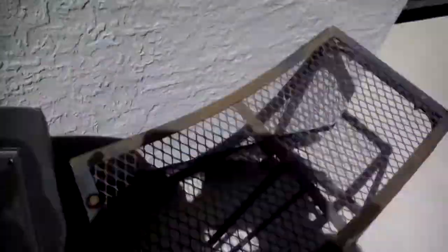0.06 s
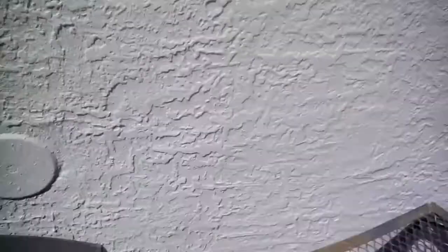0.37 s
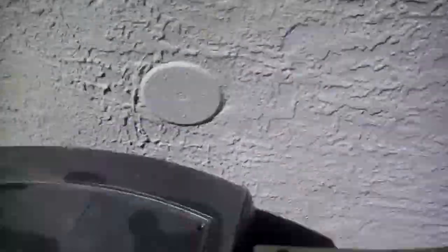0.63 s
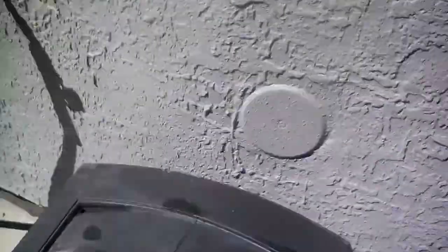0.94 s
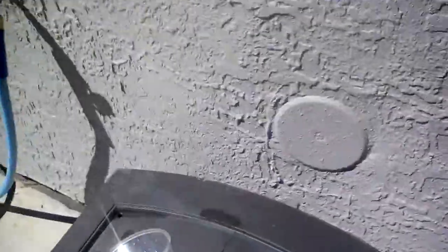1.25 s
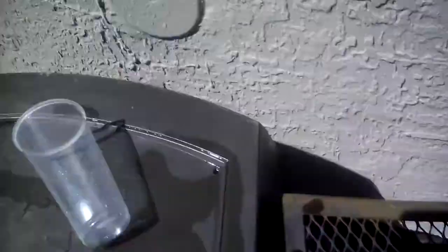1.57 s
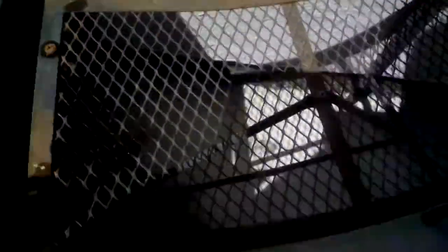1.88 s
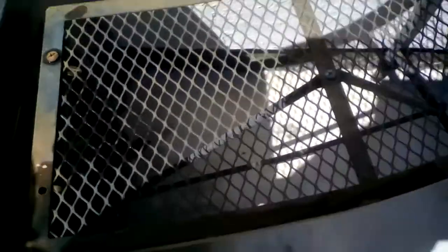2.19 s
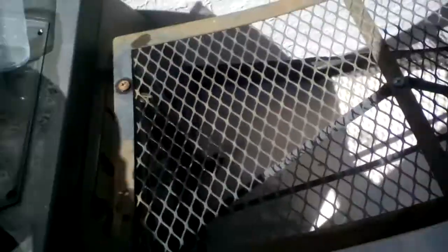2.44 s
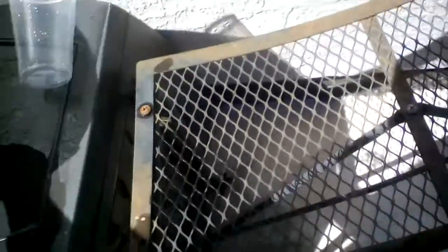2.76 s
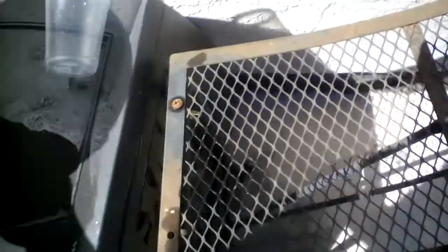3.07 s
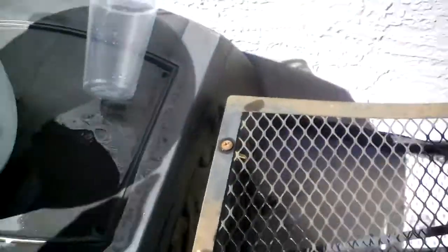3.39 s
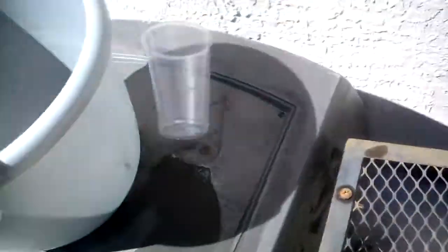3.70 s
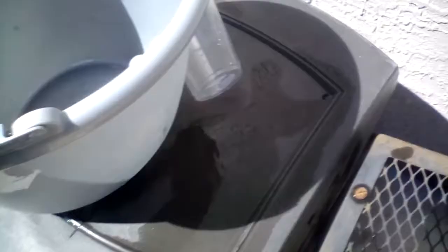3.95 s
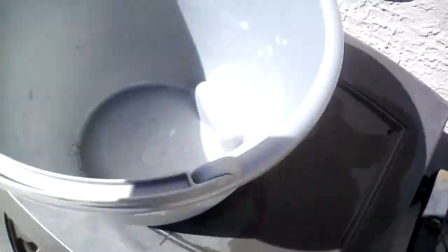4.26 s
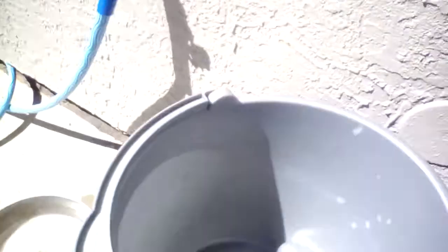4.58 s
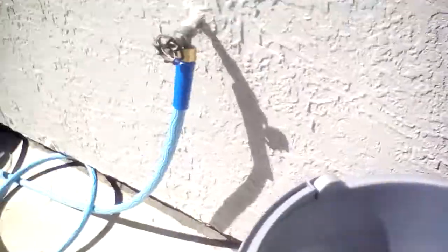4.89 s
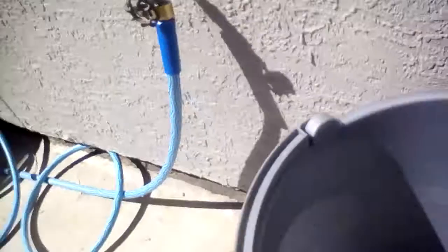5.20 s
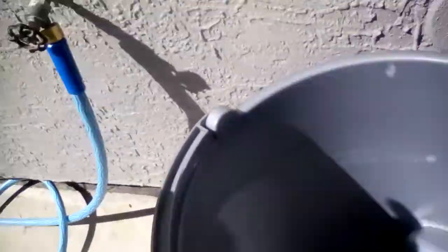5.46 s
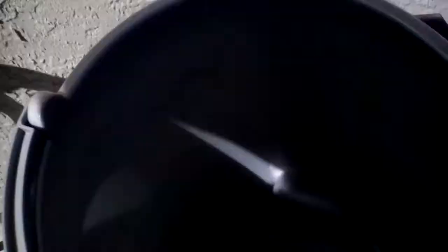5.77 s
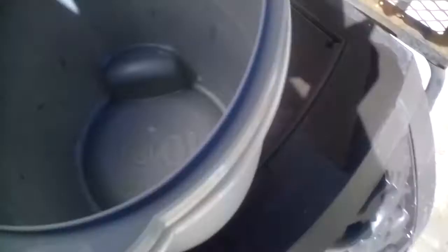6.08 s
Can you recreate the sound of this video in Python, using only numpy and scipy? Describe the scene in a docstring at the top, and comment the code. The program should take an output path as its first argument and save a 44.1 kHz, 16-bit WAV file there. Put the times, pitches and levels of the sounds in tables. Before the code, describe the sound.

A hand grips a camera, making small sharp clicks, rustles and soft hisses of skin sliding right at the microphone. About three seconds in, a little further off, a plastic bucket bumps onto a hollow plastic stand with a low ring, scrapes along it, clacks brightly and is lifted off with a thud. The close clicking, rubbing and dull thumping then return until the end, over the faint hush of a quiet patio.

```python
"""First come small clicks and a soft hiss: a camera's case snaps under someone's grip, and skin
slides past its microphone. With the other hand they move a plastic bucket on a quiet patio.
About three seconds in, the bucket bumps onto a hollow plastic stand, scrapes along it, clacks
and is lifted off. Each hit makes the plastic ring; each scrape is a stream of tiny slips.
The hand keeps clicking, rustling and thudding on the case to the end."""
import sys
import numpy as np
from scipy import signal
from scipy.fft import rfft, irfft
from scipy.io import wavfile
from scipy.ndimage import uniform_filter1d

SR = 44100
rng = np.random.default_rng(int(sys.argv[2]) if len(sys.argv) > 2 else 0)


def put_to_file(sound):
    """Save the sound as 16-bit audio at rate SR, in the file named by the first command-line argument."""
    columns = np.atleast_2d(sound).T  # one column per channel
    safe = np.clip(columns, -1, 1)
    whole_steps = np.round(safe * 32767)
    wavfile.write(sys.argv[1], SR, whole_steps.astype(np.int16))


N = 270774
RING_TIME = np.arange(16384) / SR  # seconds since a hit; ring_s is the time a ring takes to fall 60 dB


# The notes the camera case rings at: pitch_hz, boost_db, ring_s
CASE_NOTES = [(320, -12, 0.05), (715, 1.5, 0.019), (1042, 0.5, 0.018), (1479, 3, 0.022), (2190, 1, 0.022),
              (2860, -4.5, 0.036), (5600, -14.5, 0.007)]
def click(db, thud_db, bright_db, muffle_db, rebound_s=.0004, rebound_db=-9):
    """The case snaps and springs back; the finger adds a thud and muffles the highest part."""
    snap = ring(CASE_NOTES, detune=0.11, scatter_db=3.5)
    snap = snap + noisy_ring(ring_s=0.012, db=-5.5) + noisy_ring(ring_s=.12, db=-32.5)
    snap = echo(snap[:4096], rebound_s * rng.uniform(.6, 1.4), -undb(rebound_db))
    treble_db = db + bright_db
    top_db = treble_db - muffle_db
    lows = [(40, thud_db - 14), (130, thud_db + 0.5), (350, thud_db + 1)]
    mids = [(900, db - 3.5), (2000, db - 5.5), (3200, treble_db), (5800, treble_db - 1)]
    highs = [(8200, top_db - 2), (10500, top_db), (15500, top_db - 9)]
    return colour(snap, lows + mids + highs)


# The clear clicks of the case: start_s, strength_db, bright_db, muffle_db
CASE_CLICKS = [(0.0405,-8,-5.5,21), (.123,-8,-38,12), (0.1304,-2.5,4,31.5), (0.2215,8,-3.5,39),
               (0.4229,7,-17.5,37), (.471,-10,-3,28), (0.4863,5,-23.5,14), (.585,1.5,-13.5,58),
               (0.7466,2,-21,32), (1.2079,11.5,-14.5,32), (1.3975,0.5,-39,10), (1.5505,-9,6,10),
               (1.553,-13,12.5,14), (1.5623,-9,6,7), (1.5744,8,-6.5,20), (1.6029,2.5,-18.5,38),
               (1.675,11.5,-6,23), (1.723,7.5,-6,24), (1.755,4,-11,18.5), (1.78,-1,-3.5,6.5),
               (1.7965,4.5,-12,16.5), (1.8,-7,-6,5), (1.811,3,-10,11), (1.8184,11,-6,19),
               (1.8582,-17,20,14), (1.9799,12,-18,30), (2.083,-25,7,19), (2.1087,-9.5,-11.5,20.5),
               (2.1517,11,-12.5,15), (2.2156,13.5,-3,29.5), (2.242,-10.5,10,18.5), (2.2826,-6.5,-5,19),
               (2.3105,-10,-6.5,12), (2.7755,-21,-11.5,-1), (3.8893,3.5,-5.5,24), (4.0106,0.5,-12.5,37.5),
               (4.073,-12,-4.5,38), (4.1373,16,-4,55), (4.146,-0.5,-28,14), (4.1736,-11,-17,10),
               (4.342,-6,-16,11.5), (4.388,9,1,21), (4.4719,-5.5,-15,28.5), (4.551,14,-9,5),
               (4.5573,8.5,-7,18), (4.5814,3,0.5,14), (4.607,6,-4,23), (4.6946,11.5,-14,43),
               (5.0191,13.5,-23.5,20), (5.345,11.5,-14,20), (5.35,4,-25,40), (5.371,10.5,-25,22),
               (5.3888,9,-14,22), (5.4625,-0.5,-12.5,41), (5.5299,16.5,-15,10.5), (5.6807,-16,-37,6.5),
               (5.8393,-2,-3,0.5), (5.885,10.5,-16.5,39), (5.8918,8,-4.5,30), (5.922,-1.5,-18.5,8),
               (5.9577,-2.5,-18,14), (6.0186,12,-12,25)]
def case_clicks(thud_over_rumble_db=54.5, thud_share=0.3):
    """The case clicks in the hand; a firmer grip or a stronger click makes the fingertip thud more."""
    out = np.zeros(N)
    times, _, rumble_db = np.transpose(GRIP_EFFORT)
    for start_s, db, bright_db, muffle_db in CASE_CLICKS:
        thud_db = np.interp(start_s, times, rumble_db) + thud_over_rumble_db + thud_share * db
        add(out, start_s, click(db, thud_db, bright_db, muffle_db))
    return out


# The notes the bucket rings at: pitch_hz, boost_db, ring_s
BUCKET_NOTES = [(147, 12, 0.12), (200, 16, 0.064), (330.6, 16, 0.15), (859, 8.5, 0.031), (932, 7.5, 0.023),
                (1243, -13, 0.076), (1240, 0, 0.046), (1737, -5, 0.056), (2397, 12.5, 0.056),
                (3520, 14.5, 0.055), (4150, 15, 0.035)]
# Hard hits on the bucket's wall: start_s, strength_db, dull_above_hz
BUCKET_HITS = [(3.4893,5,6800), (3.4912,14.5,3020), (3.536,2.5,2260), (3.803,2,4770), (4.5605,9,1430)]
def bucket_clacks():
    """Hard hits make the bucket's wall ring with a short, bright clack."""
    return knocks(BUCKET_HITS, BUCKET_NOTES, crack_db=3.5, crack_s=0.041,
                  tail_db=-13, tail_s=0.25, spike_db=-14.5, top_db=-11.5)


# The notes the hollow stand rings at: pitch_hz, boost_db, ring_s
STAND_NOTES = [(136.5, 20, 0.14), (220.6, 19, 0.15), (340, 19.5, 0.1), (553, 6, 0.083), (910, 5, 0.26),
               (1130, 6, 0.046), (1534, 10, 0.098), (1590, 11, 0.24), (2360, -3, .1), (3760, 2, .14)]
# The bucket bumping the stand: start_s, strength_db, dull_above_hz
STAND_HITS = [(2.8862, 12, 1820), (2.896, 2, 2450), (2.903, 8.5, 1400), (2.920, -5, 1690),
              (2.930, 7.5, 1690), (2.953, -18, 1870), (3.021, -10, 1720), (3.199, -2.5, 1500),
              (3.278, 0, 422), (3.321, -6.5, 500)]
def stand_knocks():
    """The bucket lands, and the stand answers with a low, hollow ring."""
    return knocks(STAND_HITS, STAND_NOTES, crack_db=-0.5, crack_s=0.028,
                  tail_db=-3, tail_s=0.37, spike_db=-25, top_db=-33)


# How the scrape swells and fades: time_s, grit_db, rumble_db
SCRAPE_LEVELS = [(2.885,-31,-29.5), (2.93,-42,-38.5), (3.02,-40,-55), (3.19,-41,-38.5), (3.25,-53.5,-50),
                 (3.33,-50.5,-45.5), (3.43,-74,-58.5), (3.54,-64,-45), (3.78,-55.5,-52.5), (3.98,-64,-52)]
# The tone of its grit: pitch_hz, level_db
GRIT_TONE = [(200, -13), (550, 8.5), (1150, 5), (1800, -12.5), (3500, -15.5), (5800, -29), (7200, -38),
             (10000, -63)]
def bucket_scrape():
    """The bucket drags along the stand, and its tiny slips set the stand ringing."""
    return rub(gains(SCRAPE_LEVELS), STAND_NOTES, GRIT_TONE, slips_per_s=1200,
               spread_db=0, grit_db=-1.5, rumble_db=2.5, uneven_db=4.5)


def bucket_chatter(hz=1650, ring_s=0.011, rise_s=0.0011, db=-26, spread_db=3, count=7, gap_s=.0091):
    """Plastic sticks and slips a few times as the bucket lifts."""
    out = np.zeros(N)
    times = 3.823 + gap_s * np.arange(count)
    shape = fade(ring_s) * (1 - np.exp(-RING_TIME / rise_s))
    for start_s, (size, pitch, late) in zip(times, rng.uniform(-1.9, 1, (count, 3))):
        slip = shape * np.sin(2 * np.pi * hz * (1 + .08 * pitch) * RING_TIME)
        add(out, start_s + 0.0007 * late, undb(db + spread_db * size) * slip)
    return out


# Dull bumps that reach the microphone through the hand: start_s, strength_db, pitch_hz, ring_s
HAND_BUMPS = [(.594,-28.5,100,0.027), (0.694,-24.5,111,0.078), (1.31,-32.5,93,0.11),
              (1.711,-14.5,200,0.021), (2.276,-27,172.5,0.11), (3.8045,5.5,139,0.021), (3.813,-6,158,0.023),
              (4.008,-23,111,0.065), (4.147,-26,238,0.013), (4.159,-21,260,0.016), (4.1734,-18,288,0.013),
              (4.353,-17,230,0.012), (4.367,-13,278,0.012), (4.5595,-7,99,0.034), (5.019,-14,181,0.026),
              (5.258,-26.5,220,0.033), (5.351,-20,220,0.013), (5.369,-18.5,115,0.02), (5.434,-23,233,0.019),
              (5.6807,-10.5,283,0.015), (5.758,-14.5,204,0.01), (5.924,-25.5,185,0.037),
              (5.958,-8,220,0.015)]
def hand_bumps(settle_s=0.0023, rise_s=0.0015, overtone_ratio=2.17, overtone_db=-12):
    """Short thuds with one higher note on top; the pitch sags as the contact relaxes."""
    out = np.zeros(N)
    for start_s, db, hz, ring_s in HAND_BUMPS:
        sagging_hz = hz * (1 + np.exp(-RING_TIME / settle_s))
        low_note = np.sin(2 * np.pi * np.cumsum(sagging_hz) / SR)
        overtone = undb(overtone_db) * np.sin(2 * np.pi * overtone_ratio * hz * RING_TIME)
        shape = fade(ring_s) * (1 - np.exp(-RING_TIME / rise_s))
        add(out, start_s, -undb(db) * shape * (low_note + overtone))
    return colour(out, [(25, -2), (50, 2), (90, 6), (500, -4), (1500, 10.5)])


# Strokes of skin past the microphone: start_s, length_s, hiss_db, air_below_hiss_db, hole_over_hiss_db
SKIN_STROKES = [(0,0.054,-60,16,-16), (0.361,0.046,-47.5,25,-13), (0.447,0.5,-60,36,-16),
                (0.68,0.13,-49.5,4.5,1.5), (0.842,.19,-51.5,1.5,6.5), (1.028,0.078,-51.5,-1,1),
                (1.128,0.074,-48.5,3,3.5), (1.217,0.052,-50.5,7,-20), (1.294,0.046,-78,-7,-12),
                (1.365,0.017,-39,1.5,-1), (1.411,0.036,-43.5,0.5,-1), (1.504,0.075,-42,3.5,-14),
                (1.648,0.38,-53.5,6,-9), (2.022,0.36,-66,10.5,-4), (2.356,0.17,-83,14,6),
                (4.015,0.055,-54.5,13,-20), (4.11,0.084,-58,7.5,-12.5), (4.317,0.097,-62.5,4.5,-16),
                (4.39,0.27,-60,26.5,-16.5), (4.704,0.19,-40,10.5,-21), (4.941,0.13,-53,23,-7),
                (5.084,0.069,-54.5,24,-13), (5.187,0.09,-54.5,11.5,-11), (5.303,0.3,-68.5,9,-6),
                (5.83,0.21,-69.5,4,-9)]
def stroke_gains(rise_s=0.014, fall_s=0.022, arch_db=0.5):
    """Volume curves for hiss, air and hole; a stroke peaks midway, where the skin moves fastest."""
    t = np.arange(N) / SR
    out = np.zeros((3, N))
    for start_s, length_s, db, muffle_db, hole_db in SKIN_STROKES:
        rise = (1 + np.tanh((t - start_s) / rise_s)) / 2
        fall = (1 + np.tanh((start_s + length_s - t) / fall_s)) / 2
        arch = np.sin(np.pi * np.clip((t - start_s) / length_s, 0, 1)) - 2 / np.pi
        crest = np.interp(arch, [-1, 0, 1], undb([-arch_db, 0, arch_db]))
        out += np.outer(undb([db, db - muffle_db, db + hole_db]), rise * fall * crest)
    return out


# The tones of the skin's hiss, its airy top and the microphone's small hole: pitch_hz, level_db
HISS_TONE = [(400,-15.5), (1200,-9.5), (2200,-5.5), (3400,-4.5), (4500,-2), (5700,-6), (6800,-7.5),
             (8000,-25), (12000,-28.5)]
AIR_TONE = [(4500, -1), (7000, -4), (8500, -2.5), (10200, -2.5), (13000, -4), (15500, -12.5)]
HOLE_TONE = [(3000,-27), (4600,-5.5), (5500,-5), (6200,-3), (7200,-16.5), (9000,-30.5)]
def sliding_skin(hiss_db=1, uneven_db=0.9):
    """Sliding skin hisses; over the microphone's hole it turns airier and makes the hole ring."""
    hiss_gain, air_gain, hole_gain = stroke_gains()
    rubbing = friction(CASE_NOTES, slips_per_s=25000, spread_db=2.5, ring_s=.03, ring_db=-11)
    hiss = undb(hiss_db) * hiss_gain * unit(colour(rubbing, HISS_TONE))
    air = air_gain * noise(AIR_TONE)
    hole = hole_gain * noise(HOLE_TONE)
    return (hiss + air + hole) * undb(uneven_db * wander(turns_per_s=37))


# Short skids of a finger: start_s, length_s, level_db, dull_above_hz
FINGER_SKIDS = [(0.352,0.062,-34.5,1880), (0.672,0.052,-38,1370), (1.97,0.044,-30.5,2340),
                (2.262,0.076,-44,1140), (2.493,0.064,-60,1800), (4,0.061,-44.5,800), (5.2,0.087,-47.5,600),
                (5.42,0.017,-34,1496)]
def finger_rasps():
    """A finger skids, and its crowded slips ring the case."""
    out = np.zeros(N)
    skid = friction(CASE_NOTES, slips_per_s=2400, spread_db=0.5, ring_s=0.022, ring_db=-2.5)
    for start_s, length_s, db, hz in FINGER_SKIDS:
        first, count = int(start_s * SR), int(length_s * SR)
        lows = [(80, -6), (hz / 4, -6), (hz / 2, -1), (hz * 0.75, 0)]
        highs = [(hz * 1.18, -9), (hz * 1.9, -14), (hz * 2.7, -26), (12000, -46)]
        burst = colour(skid[first:first + count], lows + highs)
        add(out, start_s, undb(db) * unit(burst * signal.windows.tukey(count, .6)))
    return out


# How hard the hand works on the case: time_s, rustle_db, rumble_db
GRIP_EFFORT = [(0,-66,-75), (.32,-61,-53), (.42,-47.5,-51), (.55,-50.5,-46), (0.638,-62,-63.5),
               (.76,-49,-47), (.85,-80,-80), (1.28,-64.5,-50), (1.47,-53,-53), (1.75,-42.5,-46.5),
               (1.97,-41,-47.5), (2.18,-60,-46.5), (2.5,-68.5,-54), (2.8,-78,-63), (3.95,-69,-62.5),
               (4.12,-45,-43.5), (4.25,-61.5,-51), (4.599,-55.5,-50), (4.82,-50.5,-42), (4.93,-53.5,-58),
               (5.06,-53,-44.5), (5.17,-66,-61.5), (5.4,-45.5,-46.5), (5.6,-51,-48.5), (5.7,-71,-56),
               (5.92,-44.5,-42.5), (6.14,-77,-70)]
def grip_gains(shift_rustle_db=-50, shift_rumble_db=-48.5, click_share=0.68, lead_s=.003, settle_s=.013):
    """Volume curves for rustle and rumble: the hand's slow work plus a brief shift at each click."""
    rustle, rumble = gains(GRIP_EFFORT)
    shift = np.zeros(N)
    for start_s, db, _, _ in CASE_CLICKS:
        shift[int(start_s * SR)] = undb(click_share * db)
    lag = RING_TIME - RING_TIME.mean()
    swell = np.exp(-np.maximum(-lag / lead_s, lag / settle_s))
    shift = signal.fftconvolve(shift, swell, mode="same")
    rustle = np.hypot(rustle, undb(shift_rustle_db) * shift)
    rumble = np.hypot(rumble, undb(shift_rumble_db) * shift)
    return rustle, rumble


# The tone of the grip's rustle: pitch_hz, level_db
RUSTLE_TONE = [(150, -25), (450, 2), (1000, -3.5), (1700, -5.5), (2600, -15), (5000, -17.5), (8000, -44.5)]
def grip_rustle(rustle, rumble):
    """The hand rubs the case as it holds on, rustling and rumbling."""
    return rub((rustle, rumble), CASE_NOTES, RUSTLE_TONE, slips_per_s=1800,
               spread_db=3.5, grit_db=-1, rumble_db=-0.5, uneven_db=3)


def finger_creaks(rustle, count=330, low_hz=260, high_hz=1700, cycles=7, softest_db=15, range_db=10):
    """Fingertips let go in small jerks, each a dull pop with its own pitch, louder as the grip shifts."""
    out = np.zeros(N)
    t = RING_TIME[:2048]
    for when, pitch, size in rng.random((count, 3)):
        hz = low_hz * (high_hz / low_hz) ** pitch
        pop = fade(cycles / hz)[:len(t)] * np.sin(2 * np.pi * hz * t)
        add(out, when * N / SR, rustle[int(when * N)] * undb(softest_db + range_db * size) * pop)
    return out


def small_ticks(count=45, over_rustle_db=31, spread_db=4):
    """The case ticks faintly at random moments, louder when the grip is busy."""
    out = np.zeros(N)
    times, rustle_db, _ = np.transpose(GRIP_EFFORT)
    for when, size in rng.random((count, 2)):
        start_s = when * N / SR
        db = np.interp(start_s, times, rustle_db) + over_rustle_db + spread_db * (2 * size - 1)
        add(out, start_s, click(db, thud_db=db + 7, bright_db=-8.5, muffle_db=24))
    return out


# The tone of the outdoor background: pitch_hz, level_db
PATIO_TONE = [(30, -12.5), (55, -5), (90, 4.5), (150, -26), (400, -37), (950, -15), (1800, -38.5),
              (6500, -35), (8000, -46.5), (15000, -59.5)]
def patio(level_db=-58.5):
    """A faint, steady outdoor hush."""
    return undb(level_db) * noise(PATIO_TONE)


def knocks(hits, notes, crack_db, crack_s, tail_db, tail_s, spike_db, top_db):
    """Hits make a whole hollow plastic wall ring; a softer contact leaves out the highs."""
    out = np.zeros(N)
    for start_s, db, hz in hits:
        body = ring(notes, detune=.01, scatter_db=2, spike_db=spike_db)
        hit = body + noisy_ring(crack_s, crack_db) + noisy_ring(tail_s, tail_db)
        contact_tone = [(40, -14), (120, -2), (hz, -2), (2 * hz, -14), (4 * hz, -28), (8 * hz, -50)]
        add(out, start_s, undb(db) * colour(hit, contact_tone))
    tone = [(1700, 1), (2150, -6.5), (3300, -8.5), (6300, -7), (8000, top_db), (15000, top_db - 7.5)]
    return colour(out, tone)


# The tone of the low rumble under any rubbing: pitch_hz, level_db
RUMBLE_TONE = [(25, -26), (55, -7.5), (100, 3.5), (230, -4), (380, -12.5), (700, -27), (2000, -66.5)]
def rub(volumes, notes, tone, slips_per_s, spread_db, grit_db, rumble_db, uneven_db):
    """Gritty slips ring an object over the low rumble of the moving contact."""
    grit_gain, rumble_gain = volumes
    grains = friction(notes, slips_per_s, spread_db, ring_s=.03, ring_db=2.5)
    grit = undb(grit_db) * grit_gain * unit(colour(grains, tone))
    rumble = undb(rumble_db) * rumble_gain * noise(RUMBLE_TONE)
    return (grit + rumble) * undb(uneven_db * wander(turns_per_s=55))


def friction(notes, slips_per_s, spread_db, ring_s, ring_db):
    """A stream of tiny, uneven slips, each ringing the object's notes."""
    sizes = undb(spread_db * np.minimum(rng.exponential(size=N), 4))
    slips = (rng.random(N) < slips_per_s / SR) * sizes * rng.standard_normal(N)
    return signal.fftconvolve(slips, ring(notes) + noisy_ring(ring_s, ring_db))[:N]


def ring(notes, detune=0, scatter_db=0, spike_db=0):
    """A sharp spike and the notes it sets off; each spot that is hit mixes them differently."""
    out = undb(spike_db) * signal.unit_impulse(len(RING_TIME))
    for (hz, db, ring_s), (pitch, level) in zip(notes, rng.uniform(-1.3, 1, (len(notes), 2))):
        size = undb(db + scatter_db * level) * 2 * np.log(1000) / (ring_s * SR)
        out += size * fade(ring_s) * np.cos(2 * np.pi * hz * (1 + detune * pitch) * RING_TIME)
    return out


def noisy_ring(ring_s, db):
    """Many small notes blur into fading noise; db sets its total energy."""
    blur = rng.standard_normal(len(RING_TIME)) * fade(ring_s)
    return blur * undb(db) / np.linalg.norm(blur)


def fade(ring_s):
    """A curve that falls 60 dB every ring_s seconds."""
    return np.exp(-np.log(1000) * RING_TIME / ring_s)


def echo(x, delay_s, gain):
    """Add one delayed copy, keeping about the same loudness."""
    return (x + gain * np.pad(x, (int(delay_s * SR), 0))[:len(x)]) / np.hypot(1, gain)


def wander(turns_per_s):
    """A slow random drift, roughly between -1 and 1."""
    points = rng.standard_normal(N // 20)
    return np.interp(np.arange(N) / SR * turns_per_s, np.arange(len(points)), points)


def noise(tone):
    """Steady noise with the given tone."""
    return unit(colour(rng.standard_normal(N), tone))


def colour(x, tone, size=2048):
    """Turn lows and highs up or down along (pitch_hz, level_db) points."""
    hz, db = np.transpose(tone)
    grid = np.maximum(np.fft.rfftfreq(size, 1 / SR), 1)
    cepstrum = irfft(np.log(undb(np.interp(np.log(grid), np.log(hz), db))))
    # Fold the filter so that it rings only after a hit, never before.
    cepstrum[1:size // 2] *= 2
    cepstrum[size // 2 + 1:] = 0
    return signal.fftconvolve(x, irfft(np.exp(rfft(cepstrum))))[:len(x)]


def gains(table):
    """One smooth volume curve per dB column, silent outside the table's times."""
    times, *columns = np.transpose(table)
    curves_db = [np.interp(np.arange(N) / SR, times, db, left=-np.inf, right=-np.inf) for db in columns]
    return [uniform_filter1d(undb(db), size=300) for db in curves_db]


def undb(db):
    """Turn decibels into a multiplier."""
    return 10 ** (np.asarray(db) / 20)


def unit(x):
    """Scale to an average (rms) level of 1."""
    return x / np.sqrt(np.mean(x ** 2))


def add(out, start_s, x):
    """Mix x into out from start_s."""
    first = max(int(start_s * SR), 0)
    out[first:first + len(x)] += x[:max(N - first, 0)]


def scene():
    """The hand is right at the microphone; the bucket is further off and echoes from the house wall."""
    rustle, rumble = grip_gains()
    grip = grip_rustle(rustle, rumble) + finger_creaks(rustle)
    hand = case_clicks() + small_ticks() + finger_rasps() + sliding_skin() + grip + hand_bumps()
    plastic = bucket_scrape() + stand_knocks() + bucket_clacks() + bucket_chatter()
    return (hand + echo(plastic, delay_s=0.001077, gain=0.21) + patio())[None]


def record(dry):
    """The camera flattens peaks that are too loud and cuts the very highest sounds."""
    top_hz = 15700
    return signal.sosfilt(signal.ellip(8, .2, 70, top_hz, fs=SR, output="sos"), np.clip(dry, -1, 1))


dry = scene()
out = record(dry)
put_to_file(out)
```